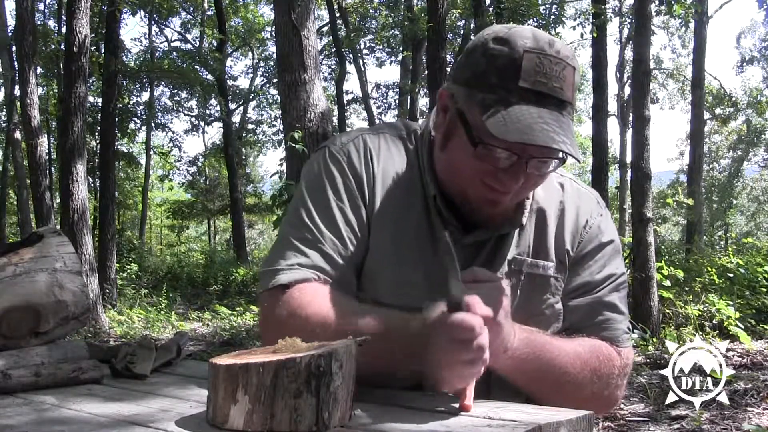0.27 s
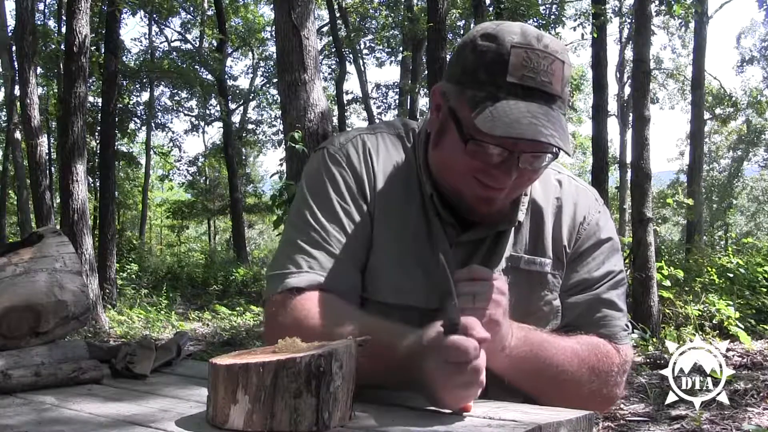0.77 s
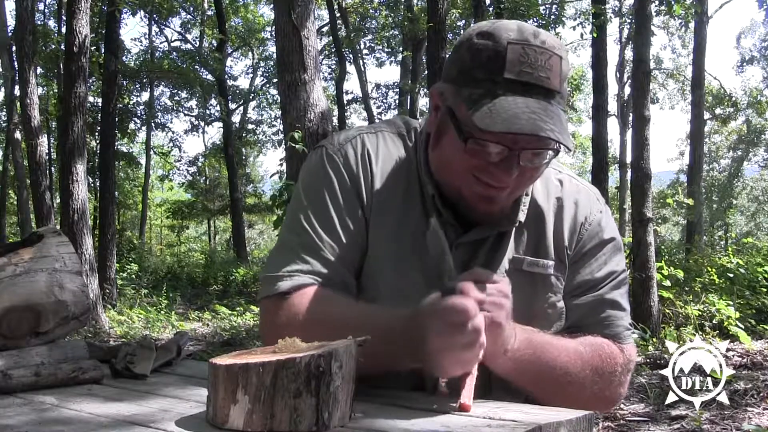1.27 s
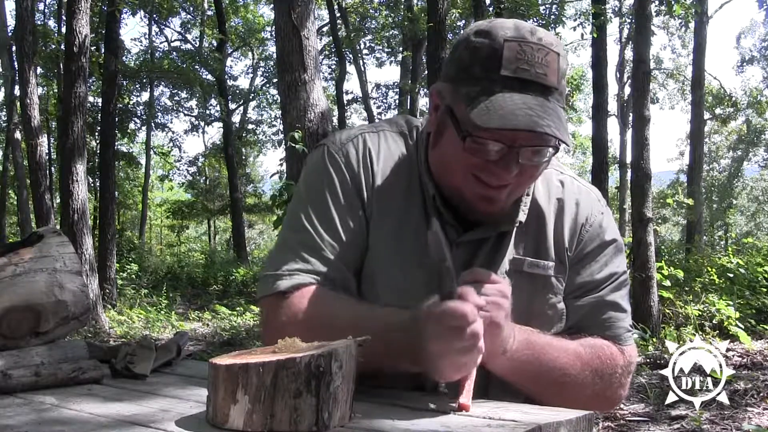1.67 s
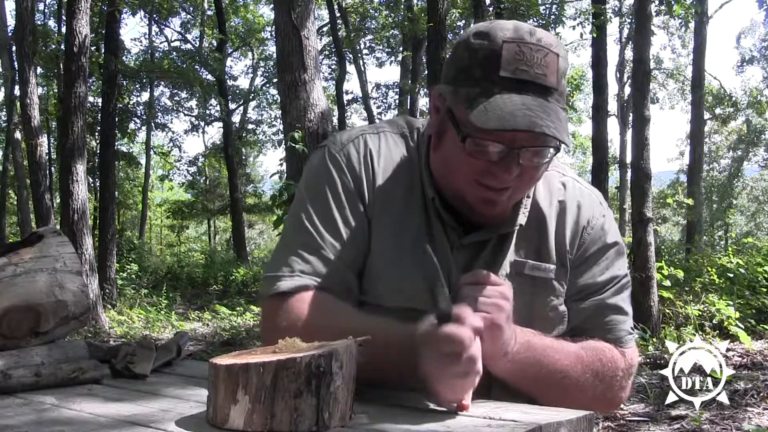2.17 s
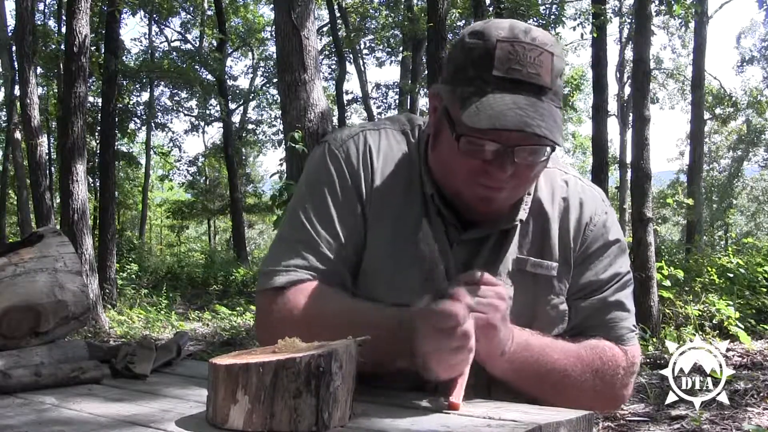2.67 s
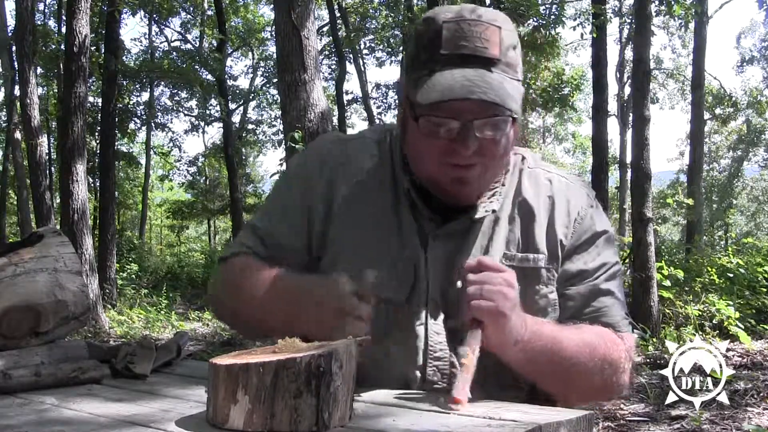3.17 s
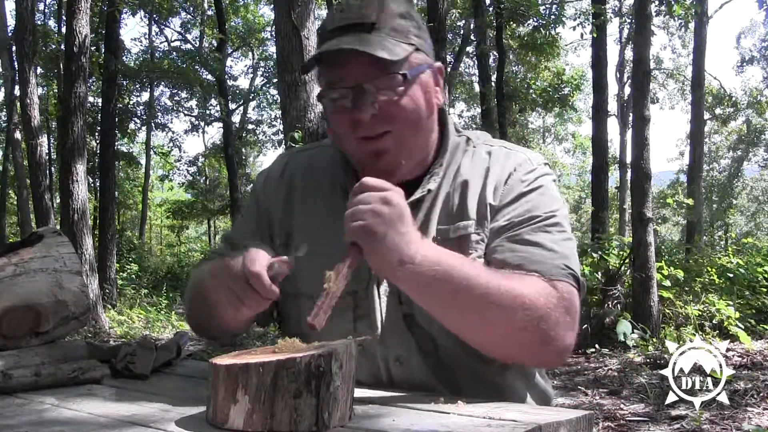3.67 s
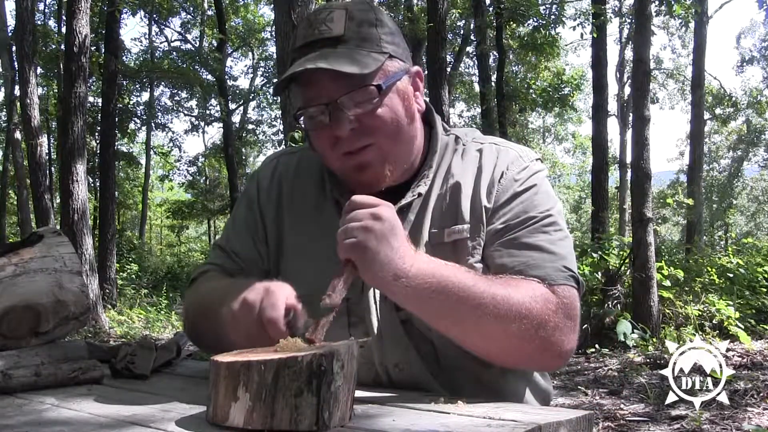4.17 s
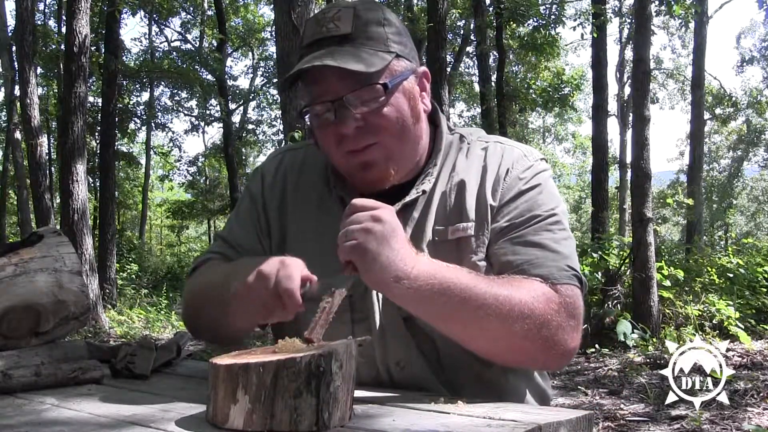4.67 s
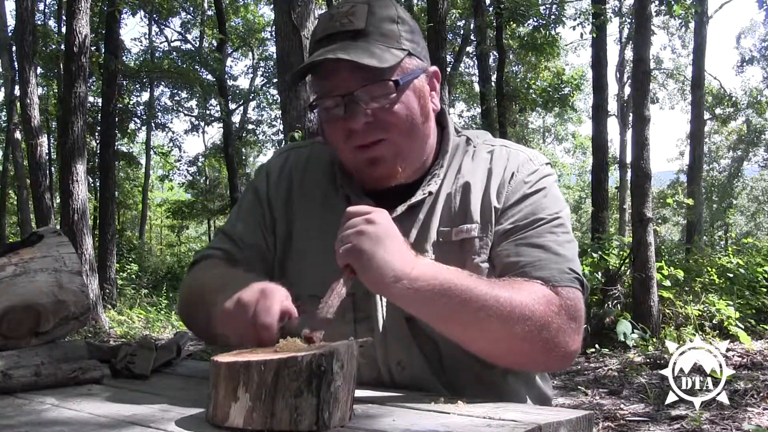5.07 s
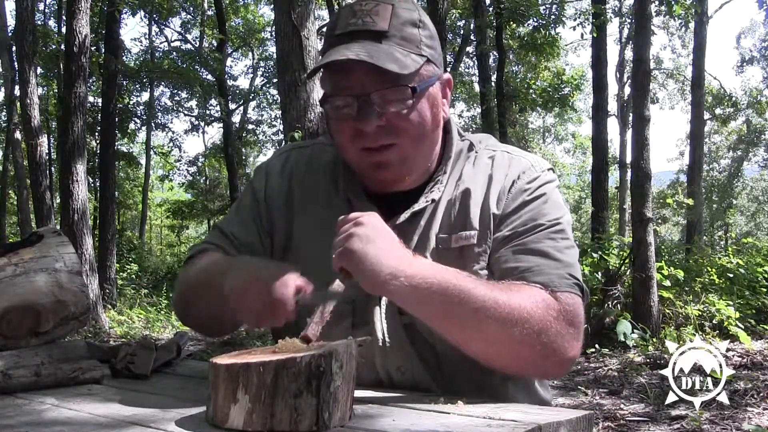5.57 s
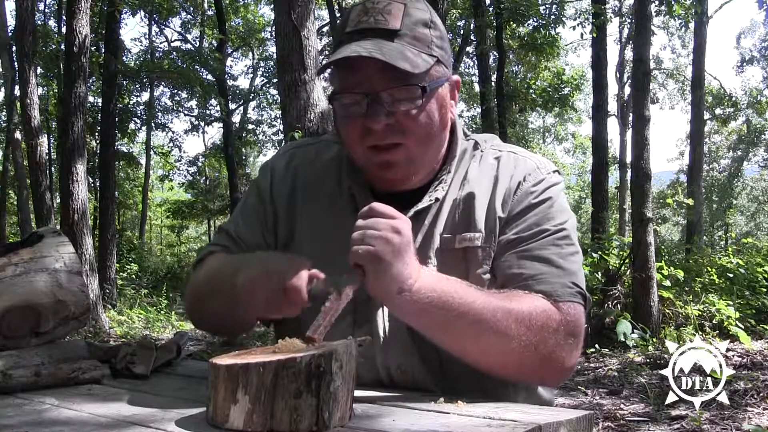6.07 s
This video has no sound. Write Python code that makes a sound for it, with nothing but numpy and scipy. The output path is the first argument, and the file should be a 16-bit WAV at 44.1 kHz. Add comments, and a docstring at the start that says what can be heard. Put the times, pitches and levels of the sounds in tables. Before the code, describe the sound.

Vigorous scraping of steel on wood comes first, about five strokes each second counting both directions, loud and near, with boomy table resonance and skipping chatter on the hard pushes. Then a gap leaves only soft forest air and shrill cicadas. Light, duller scratching and small knocks on a solid log follow, while the cicadas swell about twice a second and faint bird whistles sound in the distance.

```python
"""A hard, woody rasp comes first: the spine of a knife goes to and fro along a fatwood stick on a plank table.
Slips shake the wood and fibres hiss at the edge; on hard pushes the edge catches and skips, and the stick clacks.
After a pause the stick knocks on a sawn log and is scraped lightly. Wood sounds are noise pushes through ringing modes.
Around it is a summer forest: cicadas, made of shaped noise and buzzing clicks, build up and swell about twice
a second. A far bird whistles in gliding tones, over soft air and breeze made of shaped noise."""
import sys
import numpy as np
from scipy import signal
from scipy.fft import rfft, irfft, next_fast_len
from scipy.io import wavfile

SR = 44100
rng = np.random.default_rng(int(sys.argv[2]) if len(sys.argv) > 2 else 0)


def dump(signal):
    """Clip the signal to [-1, 1] and save it as 16-bit WAV at the path in sys.argv[1]."""
    limited = np.clip(np.atleast_2d(signal).T, -1, 1)
    pcm = np.round(limited * 32767).astype(np.int16)
    wavfile.write(sys.argv[1], SR, pcm)


N = 279329
TIME = np.arange(N) / SR   # time of every sample, in s
CUTOFF_HZ = 15900

# In the spectrum and mode tables only the shape counts: the overall level is evened out when they are used.
# Source levels are starting levels, before the gains set in the functions.

# forest air, spectrum: f/Hz, level per Hz/dB
AIR_SPECTRUM = [(20, -18), (42, -14), (62, 4), (85, -9), (120, 2.5), (240, -3), (370, 6.5), (480, -1),
                (800, -5.5), (1300, -2), (2200, -7.5), (5000, -9), (16000, -24)]
AIR_DB = -56.5
# light breeze, spectrum: f/Hz, level per Hz/dB
BREEZE_SPECTRUM = [(20, -12), (40, -15), (65, -1), (130, 1.5), (300, -0.5), (600, -3.5), (1200, -11),
                   (2200, -34)]

# how the cicadas' song builds up: t/s, chorus level/dB, near singer level/dB
CICADA_LEVELS = [(0.0, -50, -55.5), (1.4, -47.5, -53), (2.14, -47.5, -52.5), (2.62, -45, -49),
                 (3.97, -43.5, -45.5), (6.2, -45, -46)]
# average click rate of the near singer's tymbals (its sound plates): t/s, rate/(clicks per s)
TYMBAL_RATE = [(0, 510), (3.7, 330), (4.8, 310), (5.6, 240), (6.3, 370)]
# the three humps of the cicada song, spectra: f/Hz, level per Hz/dB
CHORUS_SPECTRUM = [(2200, -27), (3100, -21), (3500, -12), (3900, -4), (4200, -5), (4480, 0.5), (4780, -0.5),
                   (5030, -13.5), (5450, -12.5), (6200, -19.5), (7200, -24.5), (8000, -20)]
SINGER_SPECTRUM = [(6600, -32), (7300, -15.5), (7900, -8), (8550, 1), (8900, -0.5), (9250, 0), (9600, -6),
                   (9900, -16.5), (10400, -14), (11200, -39)]
SINGER_TOP_SPECTRUM = [(10000, -17), (10700, -8.5), (11500, 2), (12300, 1.5), (13200, 2.5), (14000, -17),
                       (14800, -79), (16000, -55)]
CHORUS_DB, SINGER_DB, SINGER_TOP_DB = 0, -0.2, -5   # offsets from the build-up
# crests of the song's swells: t/s
SWELL_TIMES = [2.75, 3.24, 3.63, 4.01, 4.52, 5.07, 5.65, 6.18]
SWELL_WIDTH_S, SWELL_FULL_S = 0.065, 4.2   # the swells deepen until they are full at this time
SWELL_CHORUS_DB, SWELL_SINGER_DB, SWELL_TOP_DB = 2.5, 2, 3   # height of a full swell

# bird whistles: start t/s, length/s, start f/Hz, end f/Hz, level/dB
BIRD_WHISTLES = [(3.784, 0.089, 2190, 2160, -59.5), (3.924, 0.21, 2670, 2650, -66),
                 (3.954, 0.059, 2700, 3250, -59), (4.697, 0.098, 3010, 2840, -60)]

# ringing modes of stick and log: f/Hz, width/Hz, level/dB
LOG_MODES = [(150.3, 9.3, -6.5), (208.6, 26.6, -1), (255.4, 18.3, 0), (325, 20, 4), (358.3, 22.3, 5),
             (450, 37, -13.5), (539, 51, -4), (713, 89, -3.5), (812, 43, -3.5), (952, 160, -15),
             (1340, 310, -14.5), (1820, 480, -15.5), (2110, 95, -7), (2600, 400, -19.5), (3010, 71, -34)]
# the stick's foot knocks on the log: t/s, wood level/dB, thump level relative to wood/dB
LOG_KNOCKS = [(3.824, -50.5, 18.5), (4.11, -43, 2.5), (4.179, -51.5, 20), (4.36, -53, 17.5),
              (4.526, -41.5, 14), (4.684, -41.5, 7), (4.789, -49, 6), (5.118, -47, 14.5), (5.349, -35, -2),
              (5.628, -37, 8.5), (5.67, -41, 3), (5.809, -38, 10.5), (6.056, -37, 3), (6.268, -47.5, 11)]
# turns that start light strokes over the log, return and push in turn: t/s, wood level/dB
LOG_STROKES = [(4.065, -54), (4.16, -59), (4.335, -64), (4.51, -60), (4.655, -54), (4.75, -46.5),
               (4.91, -46), (5.03, -44), (5.18, -44.5), (5.314, -42), (5.461, -44), (5.598, -42.5),
               (5.743, -49), (5.87, -45.5), (6.03, -42), (6.135, -43), (6.29, -57)]
LIGHT_HISS_DB = -13   # edge hiss of the light strokes relative to their wood

# ringing modes of stick and planks; the last two, broad ones are the stick's own dead knock:
# f/Hz, width/Hz, level/dB
TABLE_MODES = [(61.5, 4.4, -11.5), (141, 16, -1.5), (178, 15, -2.5), (214.3, 14, -1), (271.8, 12.6, 2.5),
               (359.7, 13, 6.5), (443, 36, -10.5), (474, 11.5, -1.5), (527, 21, 1.5), (605, 22.5, 1),
               (663, 32.6, 5), (740.3, 16.7, 3), (776, 23, 2.5), (824, 36, 1), (952, 33, 0), (989, 32, 0),
               (1084, 35, -0.5), (1153, 39, -2.5), (1329, 21, -1.5), (1475, 117, -6.5), (1597, 47, -3),
               (1730, 147, -5), (1829, 31, -1), (1911, 61, -2.5), (2127, 66, -12), (2304, 58, -5.5),
               (2530, 78, -15.5), (2723, 66, -6.5), (3600, 310, -25), (770, 350, -8), (1670, 650, -16.5)]
# the stick rocks on the plank and clacks at a pitch set by the grip: t/s, f/Hz, level/dB
CLACKS = [(0.118, 784, -25), (0.231, 816, -26), (0.775, 750, -28.5), (0.871, 750, -17), (0.887, 960, -24),
          (1.076, 766, -27), (1.688, 740, -22), (1.898, 690, -33), (2.021, 670, -38), (2.419, 685, -19.5),
          (2.432, 676, -18)]
# the arms' weight on the table frees or chokes its low modes: t/s, boom gain/dB, thump gain of strokes/dB
LEAN = [(0, -10, -1), (.55, -2, -2), (1.05, -7, -6), (1.35, 0.5, -0.6), (1.8, 2, -1.5), (2.35, 2.5, 1),
        (2.8, 3, 5.5)]
# turns that start strokes over the table, push and return in turn: t/s, wood level/dB, edge hiss level/dB
TABLE_STROKES = [(-0.035, -25, -42), (0.1, -39.5, -48), (0.216, -32, -47), (0.32, -40, -48),
                 (0.41, -31, -37.5), (0.538, -38, -46), (0.632, -33, -38.5), (0.758, -33, -44.5),
                 (0.857, -29.5, -39.5), (0.982, -33.5, -44.5), (1.063, -29, -37), (1.182, -37, -45),
                 (1.277, -33.5, -40.5), (1.383, -36, -44), (1.477, -32, -39.5), (1.588, -36, -45),
                 (1.672, -33.5, -43), (1.799, -37.5, -43.5), (1.88, -28.5, -41), (2.003, -32.5, -44.5),
                 (2.08, -32, -40), (2.205, -37, -46.5), (2.275, -32, -50), (2.405, -38.5, -46),
                 (2.468, -33, -53), (2.598, -41, -47.5), (2.682, -38, -44), (2.795, -57, -55)]
# runs of catches on the hard pushes:
# first catch t/s, last catch t/s, first wood level/dB, last wood level/dB, first edge hiss level/dB
CATCH_RUNS = [(0.009, 0.02, -23.5, -24.5, -36.5), (0.462, 0.482, -24.5, -25, -35.5),
              (0.685, 0.706, -28, -29, -54), (1.105, 1.123, -23.5, -18, -26.5),
              (1.312, 1.329, -26, -30, -32.5), (1.513, 1.526, -26, -22.5, -31),
              (1.706, 1.723, -35, -30, -30.5), (1.9, 1.936, -34, -21.5, -33.5),
              (2.111, 2.144, -28, -21.5, -31), (2.303, 2.335, -30, -28.5, -32.5),
              (2.501, 2.522, -30, -20.5, -30.5), (2.733, 2.749, -19.5, -29.5, -32.5)]
SKIP_S = 0.0175      # a caught edge skips on at about this interval
SKIP_DULL_DB = 2.0   # the edge hiss falls by this from the first catch of a run to the last
# fibres tearing at the steel edge, spectrum: f/Hz, level per Hz/dB
EDGE_SPECTRUM = [(1500, -49), (3000, 3), (3900, -8), (4800, 6), (5600, -4), (7000, -1), (8400, -3.5),
                 (9700, 3), (10800, -9), (13000, -3), (15000, -12), (16000, -13)]

# kinds of stroke. cutting: share of the time to the next turn; rise: share of the cut before its crest;
# thump_db: relative to wood; rasp_db: offset from the mix of wood and hiss levels
HARD_PUSH = dict(cutting=0.76, rise=0.43, thump_db=0, rasp_db=-1.5)
HARD_RETURN = dict(cutting=0.89, rise=0.4, thump_db=0.5, rasp_db=-0.9)
LIGHT_PUSH = dict(cutting=0.93, rise=0.54, thump_db=4, rasp_db=0.3)
LIGHT_RETURN = dict(cutting=1, rise=0.31, thump_db=-4, rasp_db=-3.5)
RASP_SHARE = 0.51   # the rasp lies this far from the wood level towards the edge hiss level, in dB


def from_db(db):
    """Turn decibels into a plain factor."""
    return 10 ** (np.asarray(db) / 20)


def rms_one(x):
    """Scale a signal to an average strength (rms) of 1."""
    return x / np.sqrt(np.mean(x ** 2) + 1e-20)


def in_time(rows):
    """Read the columns of a curve table at every sample."""
    s, *columns = np.transpose(rows)
    return [np.interp(TIME, s, column) for column in columns]


def drift(rate):
    """Smooth chance with spread 1, changing about rate times a second."""
    hz = np.fft.rfftfreq(N, 1 / SR)
    noise = rng.standard_normal(N)
    return rms_one(irfft(rfft(noise) / (1 + (hz / rate) ** 2), N))


def coloured(x, spectrum):
    """Give a white signal a spectrum that falls away beyond its ends; its power is kept."""
    size = next_fast_len(N + SR // 10, real=True)
    hz = np.fft.rfftfreq(size, 1 / SR) + 1   # the 1 avoids log(0)
    points_hz, db = np.transpose(spectrum)
    gain = from_db(np.interp(np.log(hz), np.log(points_hz), db))
    beyond_ends = np.minimum(hz / points_hz[0], points_hz[-1] / hz)
    gain *= np.minimum(1, beyond_ends) ** 4
    return irfft(rfft(x, size) * rms_one(gain), size)[..., :N]


def wide_noise(side_db):
    """White stereo noise, the same in both ears but for a side part."""
    mid, side = rng.standard_normal((2, N))
    return mid + from_db(side_db) * side * [[1], [-1]]


def grains(per_s, spread_db):
    """Fibres snap at random moments with uneven force; rms 1."""
    unevenness = np.minimum(rng.exponential(1, N), 4)
    sizes = from_db(spread_db * unevenness) * rng.choice([-1, 1], N)
    snaps = rng.random(N) < per_s / SR
    return rms_one(sizes * snaps)


def forest_air():
    """The soft, steady hush of forest air, as shaped stereo noise."""
    return from_db(AIR_DB) * coloured(wide_noise(side_db=-14.0), AIR_SPECTRUM)


def breeze():
    """A light, low breeze, as shaped noise that is different at each ear."""
    return from_db(-58.0) * coloured(rng.standard_normal((2, N)), BREEZE_SPECTRUM)


def forest(x, t60, dull_hz):
    """Trunks scatter a faint dull tail, different at each ear; t60 is the time to fall by 60 dB."""
    t = TIME[:SR // 2]
    envelope = from_db(-60 * t / t60) * (1 - np.exp(-t / 0.0063))
    tail = rng.standard_normal((2, len(t))) * envelope
    tail /= np.linalg.norm(tail, axis=1, keepdims=True)
    tail = signal.sosfilt(signal.butter(1, dull_hz, fs=SR, output="sos"), tail)
    return signal.fftconvolve(x[None], tail, axes=1)[:, :N]


def near_echoes(x, echo_db, count=14):
    """Table, log and ground send back faint early copies that ripple the spectrum."""
    out = x.copy()
    delays_s = rng.uniform(0.0018, 0.011, count)
    signs = rng.choice([-1, 1], count)
    for delay_s, sign in zip(delays_s, signs):
        lag = int(delay_s * SR)
        out[..., lag:] += sign * from_db(echo_db) / np.sqrt(count) * x[..., :-lag]
    return out / np.sqrt(1 + from_db(2 * echo_db))


def from_the_left(x, pan_db, lag_s):
    """A source left of centre is louder in the left ear and reaches the right one a little later."""
    hz = np.fft.rfftfreq(N, 1 / SR)
    right = irfft(rfft(x[1]) * np.exp(-2j * np.pi * hz * lag_s), N)
    return np.array([x[0], right]) * from_db([[pan_db / 2], [-pan_db / 2]])


def swell():
    """The song swells about twice a second, deepening until the swells are full; 0 to 1."""
    out = np.zeros(N)
    for s in SWELL_TIMES:
        depth = min(1, s / SWELL_FULL_S) ** 3
        out += depth * np.exp(-0.5 * ((TIME - s) / SWELL_WIDTH_S) ** 2)
    return out


def cicadas():
    """A far chorus blurs into a fluttering hiss; the near singer keeps the buzz of its tymbal clicks."""
    chorus_db, singer_db = in_time(CICADA_LEVELS)
    swelling = swell()
    clicks_per_s, = in_time(TYMBAL_RATE)
    unsteady_rate = clicks_per_s * (1 + 0.003 * drift(7.4))
    cycle = np.cumsum(unsteady_rate) / SR % 1   # place within one click, 0 to 1
    buzz = rms_one(1 + 0.97 * np.exp(-cycle / 0.22))   # leaves scatter each click and fill the gaps

    flutter = rms_one(from_db(0.5 * drift(120)))
    chorus = coloured(wide_noise(side_db=-13.5) * flutter, CHORUS_SPECTRUM)
    chorus *= from_db(chorus_db + CHORUS_DB + SWELL_CHORUS_DB * swelling + 0.31 * drift(8))
    singer = coloured(wide_noise(side_db=-13.0) * buzz, SINGER_SPECTRUM)
    singer *= from_db(singer_db + SINGER_DB + SWELL_SINGER_DB * swelling)
    top = coloured(wide_noise(side_db=-6.5) * buzz, SINGER_TOP_SPECTRUM)
    top *= from_db(singer_db + SINGER_TOP_DB + SWELL_TOP_DB * swelling)
    return chorus + from_the_left(singer + top, pan_db=1.2, lag_s=6e-6)


def bird(waver=0.00595, flutter_db=3.5):
    """Soft gliding whistles that waver on their way through the leaves."""
    out = np.zeros(N)
    unsteady = 1 + waver * drift(60)
    for start, length, start_hz, end_hz, db in BIRD_WHISTLES:
        along = np.clip((TIME - start) / length, 0, 1)
        hz = (start_hz + (end_hz - start_hz) * along) * unsteady
        tone = np.sin(2 * np.pi * np.cumsum(hz) / SR)
        out += from_db(db) * np.sin(np.pi * along) * tone
    return out * from_db(flutter_db * drift(30))


def ring(force, modes, low_hz, high_hz):
    """Drive those modes of a body that lie in one register; the power is kept."""
    t = TIME[:SR // 4]
    response = np.zeros(len(t))
    for k, (hz, width, db) in enumerate(modes):
        if low_hz <= hz < high_hz:
            decay = width * np.exp(-np.pi * width * t)   # a wide mode dies away sooner
            response += (-1) ** k * from_db(db) * decay * np.cos(2 * np.pi * hz * t)
    band = signal.butter(2, [low_hz * 0.8, high_hz * 1.3], "band", fs=SR, output="sos")
    response = signal.sosfilt(band, response)
    return signal.fftconvolve(force, response / np.linalg.norm(response))[:N]


def wood(modes, thump, knock, rasp):
    """The low modes belong to the support, the middle and high ones mostly to the stick."""
    low = ring(thump, modes, 40, 455)
    middle = ring(knock, modes, 455, 1250)
    high = ring(rasp, modes, 1250, 3400)
    return low + middle + high


def blow(s, length_s):
    """A short push that starts length_s before time s, peaks there at height 1 and dies away."""
    age = np.clip((TIME - s) / length_s + 1, 0, 30)
    return age * np.exp(1 - age)


def log_knocks(length_s, rasp_db, click_db, settle_s=0.019, settle_db=-18.5):
    """The stick's rough foot rocks on the end grain: one firm contact, then a brief crush as it settles."""
    knock, thump = np.zeros((2, N))
    crush = grains(per_s=6000, spread_db=-1.0)
    for s, db, thump_db in LOG_KNOCKS:
        settling = from_db(settle_db) * blow(s + settle_s, settle_s)
        push = (0.54 * blow(s, length_s) + settling) * crush
        push[int(s * SR)] += from_db(click_db)   # the firm contact, a single click
        knock += push * from_db(db)
        thump += push * from_db(db + thump_db)
    return wood(LOG_MODES, thump, knock, from_db(rasp_db) * knock)


def clacks(t60, overtone, overtone_db):
    """The hand-damped stick rings briefly in its first two bending modes."""
    out = np.zeros(N)
    for s, hz, db in CLACKS:
        span = (TIME > s) & (TIME < s + 0.1)
        age = TIME[span] - s
        onset = 1 - np.exp(-age / 0.00046)
        fade = from_db(-60 * age / t60)
        phase = 2 * np.pi * hz * age
        first = fade * np.sin(phase)
        second = from_db(overtone_db) * fade ** 2 * np.sin(overtone * phase)
        out[span] += from_db(db) * onset * (first + second)
    return out


def leaning(x, below_hz):
    """The arms' weight raises or lowers the deep boom of the table top."""
    boom_db, _ = in_time(LEAN)
    boom = signal.sosfiltfilt(signal.butter(2, below_hz, fs=SR, output="sos"), x)
    return x + (from_db(boom_db) - 1) * boom


def skips():
    """Each run is a row of evenly spaced catches: t/s, wood level/dB, edge hiss relative to wood/dB."""
    for first, last, first_db, last_db, hiss_db in CATCH_RUNS:
        count = max(2, round((last - first) / SKIP_S) + 1)
        run = np.linspace((first, first_db, 0), (last, last_db, SKIP_DULL_DB), count)
        for s, db, dull_db in run:
            yield s, db, hiss_db - dull_db - db


def contact(lift_db=-10.5, after_s=0.0056, length_s=0.0033, free_db=-0.5, free_s=0.014):
    """The edge flies clear for a few milliseconds after each catch; after a run it presses slightly less."""
    lifted, freed = np.zeros((2, N))
    for s, _, _ in skips():
        span = abs(TIME - s) < 0.03
        lifted[span] += np.exp(-0.5 * ((TIME[span] - s - after_s) / length_s) ** 2)
    for _, last, *_ in CATCH_RUNS:
        span = (TIME > last) & (TIME < last + 2 * free_s)
        freed[span] += np.sin(np.pi * (TIME[span] - last) / (2 * free_s))
    return from_db(lift_db * lifted + free_db * freed)


def catches(length_s, thump_db, rasp_db, rasp_share):
    """A catch tears a clump of fibres within a few milliseconds; a sharp one excites more high modes."""
    push, hiss, rasp = np.zeros((3, N))
    for s, db, hiss_db in skips():
        span = abs(TIME - s) < 0.02
        late = TIME[span] - s
        burst = from_db(db) * np.exp(-0.5 * (late / length_s) ** 2)
        push[span] += burst
        rasp[span] += burst * from_db(rasp_db + rasp_share * hiss_db)
        # the tearing builds up, then stops more quickly as the edge breaks free
        tearing_s = np.where(late < 0, 0.0032, 0.0014)
        hiss[span] += from_db(db + hiss_db) * np.exp(-0.5 * (late / tearing_s) ** 2)
    tear = grains(per_s=9000, spread_db=-0.5)
    body = wood(TABLE_MODES, from_db(thump_db) * push * tear, push * tear, rasp * tear)
    return body, coloured(hiss * tear, EDGE_SPECTRUM)


def stroke_forces(strokes, kinds, bite=0.62, release=2.3):
    """The blade bites early and lets go gently; hiss follows speed. Rows: thump, wood, rasp, edge hiss."""
    out = np.zeros((4, N))
    gaps = np.diff([row[0] for row in strokes])
    all_gaps = [*gaps, gaps[-2]]   # the last stroke borrows the gap of the last one of its kind
    for k, ((start, db, hiss_db), gap) in enumerate(zip(strokes, all_gaps)):
        kind = kinds[k % 2]
        along = (TIME - start) / (gap * kind["cutting"])
        span = (along > 0) & (along < 1)
        phase = np.interp(along[span], [0, kind["rise"], 1], [0, 0.5, 1])
        speed = abs(np.sin(np.pi * phase))
        grip = speed ** np.where(phase < 0.5, bite, release)
        rasp_db = db + RASP_SHARE * (hiss_db - db) + kind["rasp_db"]
        levels = from_db([[db + kind["thump_db"]], [db], [rasp_db], [hiss_db]])
        out[:, span] += levels * [speed, grip, grip, speed]
    return out


def hard_forces():
    """Over the table, the arms' weight sets how much of each stroke goes into the planks."""
    strokes = stroke_forces(TABLE_STROKES, (HARD_PUSH, HARD_RETURN))
    thump, knock, rasp, hiss = strokes * contact()
    _, thump_db = in_time(LEAN)
    return np.array([thump * from_db(thump_db), knock, rasp, hiss])


def light_forces():
    """Over the log, the hiss simply follows the strength of the stroke."""
    strokes = [(s, db, db + LIGHT_HISS_DB) for s, db in LOG_STROKES]
    return stroke_forces(strokes, (LIGHT_RETURN, LIGHT_PUSH), bite=0.42, release=1.55)


def scrape(forces, modes, slips_per_s, slip_db, judder_db, judder_hz, fibres_per_s, fibre_db):
    """Coarse slips shake the wood, fine fibres hiss at the edge, and the blade's judder sways both."""
    judder = rms_one(from_db(judder_db * drift(judder_hz)))
    thump, knock, rasp, hiss = forces * judder
    slips = grains(slips_per_s, slip_db)
    fibres = rms_one(grains(fibres_per_s, fibre_db) + 0.5 * slips)
    rough = rms_one(slips + 1.2 * fibres)
    body = wood(modes, thump * slips, knock * slips, rasp * rough)
    return body, coloured(hiss * fibres, EDGE_SPECTRUM)


def knife():
    """Hard strokes with catches and clacks over the table, then light ones with knocks over the log."""
    hard_wood, hard_edge = scrape(hard_forces(), TABLE_MODES, slips_per_s=2000, slip_db=2.0, judder_db=2.5,
                                  judder_hz=114, fibres_per_s=5700, fibre_db=1.0)
    soft_wood, soft_edge = scrape(light_forces(), LOG_MODES, slips_per_s=1000, slip_db=4.0, judder_db=2.5,
                                  judder_hz=67.3, fibres_per_s=14000, fibre_db=2.0)
    catch_wood, catch_edge = catches(length_s=0.0019, thump_db=-5.5, rasp_db=-1.0, rasp_share=0.48)
    taps = from_db(-0.5) * log_knocks(length_s=0.0039, rasp_db=-18.0, click_db=17.5)
    table = leaning(from_db(0.2) * hard_wood + from_db(1.3) * catch_wood, below_hz=280)
    rocking = clacks(t60=0.04, overtone=2.98, overtone_db=-21.0)
    body = table + rocking + from_db(-0.1) * soft_wood + taps
    edge = from_db(1.2) * hard_edge + from_db(6.0) * soft_edge + from_db(1.0) * catch_edge
    return body + near_echoes(edge, echo_db=-10.0)


def scene():
    """Add up the forest around the listener and the knife close by, with its scattered tails."""
    background = forest_air() + breeze() + near_echoes(cicadas(), echo_db=-6.5)
    whistles = bird()
    far_bird = from_db(3.5) * whistles + from_db(-13.0) * forest(whistles, t60=0.55, dull_hz=5000)
    near = knife()
    scatter = from_db(-27.5) * forest(near, t60=0.6, dull_hz=3000)
    low_scatter = from_db(-20.0) * forest(near, t60=0.51, dull_hz=170)
    return background + far_bird + near + scatter + low_scatter


def record(dry):
    """The top of the band is cut steeply."""
    return signal.sosfilt(signal.ellip(12, 0.1, 80, CUTOFF_HZ, fs=SR, output="sos"), dry)


dry = scene()
out = record(dry)
dump(out)
```